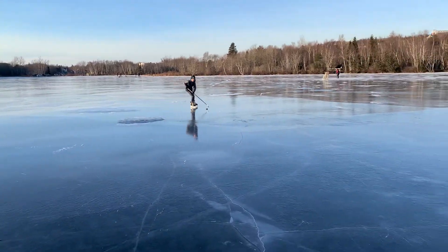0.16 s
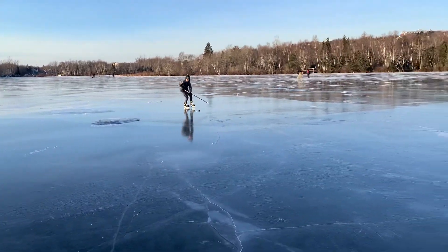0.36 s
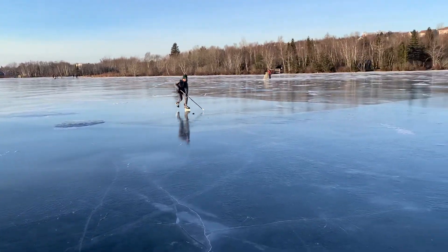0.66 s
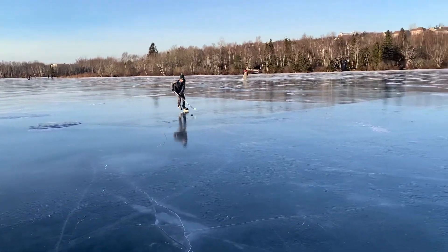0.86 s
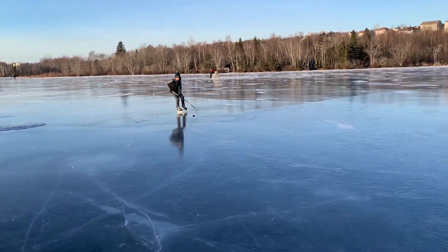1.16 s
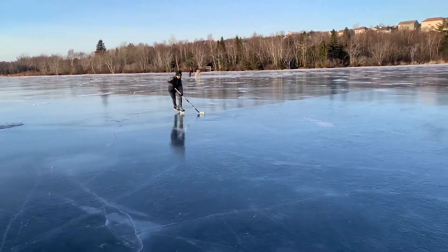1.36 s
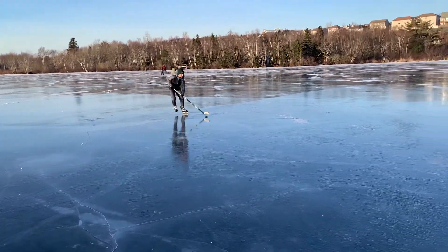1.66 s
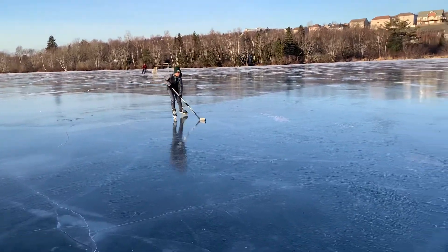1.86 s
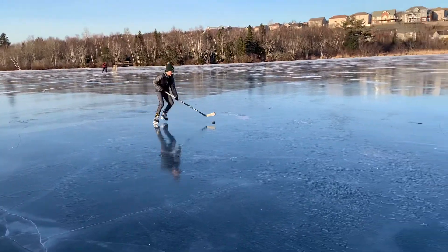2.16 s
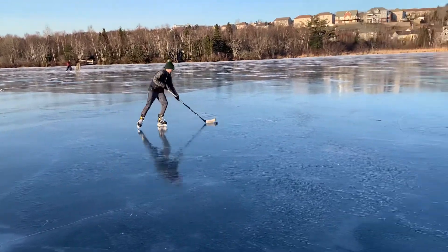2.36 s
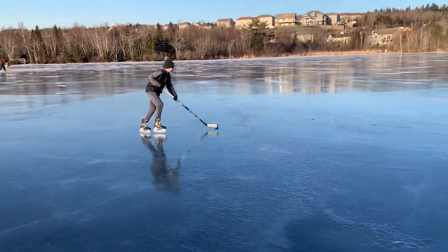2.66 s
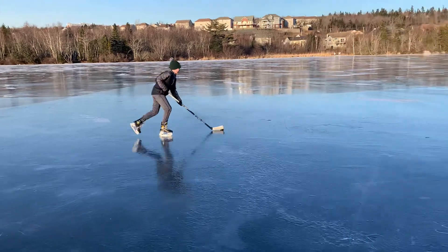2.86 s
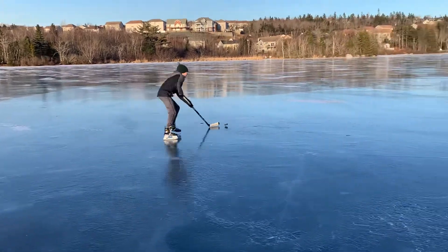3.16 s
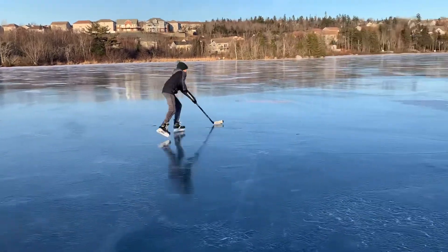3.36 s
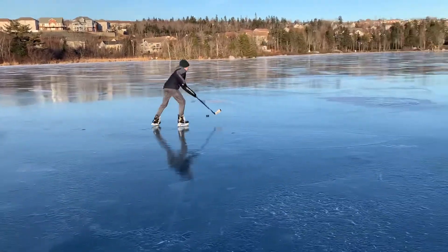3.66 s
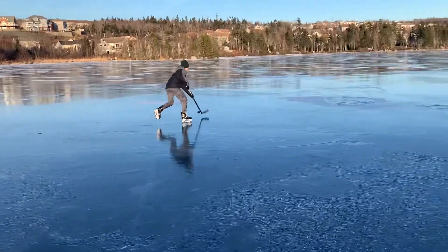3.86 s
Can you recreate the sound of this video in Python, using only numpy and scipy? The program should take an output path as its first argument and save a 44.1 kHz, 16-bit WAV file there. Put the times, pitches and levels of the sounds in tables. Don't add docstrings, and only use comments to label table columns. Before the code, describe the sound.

Ice skates scraping and catching on a frozen lake, with sharp puck-on-stick knocks over low wind rumble

```python
import sys
import numpy as np
from scipy import signal
from scipy.fft import rfft, irfft
from scipy.io import wavfile
from scipy.ndimage import uniform_filter1d

SR = 44100
rng = np.random.default_rng(int(sys.argv[2]) if len(sys.argv) > 2 else 0)


def inscribe(sig):
    pcm = np.round(np.clip(np.atleast_2d(sig).T, -1, 1) * 32767)
    wavfile.write(sys.argv[1], SR, pcm.astype(np.int16))


def voltage_ratio(decibels):
    exponent = np.asarray(decibels, float) / 20
    return 10 ** exponent


N = 176400
FREQS = np.fft.rfftfreq(N, 1 / SR)

# [f/Hz, level/dB]
WIND_COLOUR = [(20, -11), (55, 5.5), (130, 5.5), (190, -0.5), (300, -5.5), (500, -14), (1500, -45),
               (16000, -62)]
# [t/s, peak level/dB]
LUMPS = [(0.052, -39), (0.523, -41.5), (0.978, -46), (1.083, -42.5), (1.22, -56), (1.362, -31.5),
         (1.438, -48), (1.512, -47), (1.609, -45), (1.799, -47), (1.877, -31), (1.932, -37.5), (2.079, -48),
         (2.304, -33), (2.512, -37), (2.669, -34), (2.746, -27.5), (2.792, -24.5), (2.869, -31),
         (2.955, -37), (3.033, -33), (3.094, -45), (3.164, -53), (3.225, -23), (3.401, -30), (3.674, -21)]
# [t/s, peak level/dB, ring f/Hz, bending wave level/dB, crack level/dB]
LANDINGS = [
    (0.249, -30.5, 1690, -13, -13),
    (0.253, -32, 1915, -15, -2.5),
    (2.67, -26.5, 1610, 4, -10.5),
    (2.867, -17, 1260, -4.5, -22.5),
    (3.913, -37, 1330, -12, -9),
    (3.923, -33.5, 1350, -7, -12),
]
# [t/s, length/s, level/dB]
DRAGS = [
    (0.974, 0.14, -57.5),
    (1.527, 0.077, -37),
    (3.225, 0.26, -44),
]
# [t/s, level/dB]
HISS_LEVEL = [(0, -76), (.2, -67), (.4, -66.5), (.54, -51.5), (.7, -67.5), (.92, -59), (1.05, -51),
              (1.2, -64.5), (1.36, -48.5), (1.5, -64.5), (1.9, -54), (2.05, -77), (2.2, -76), (2.27, -49.5),
              (2.6, -52), (3.1, -57), (3.3, -50), (3.6, -59), (4, -62)]
# [t/s, level/dB]
SCRAPE_LEVEL = [(0, -56.5), (.12, -55), (.4, -75.5), (.54, -59.5), (.9, -65), (1.02, -58), (1.25, -60),
                (1.4, -47), (1.85, -48.5), (2.15, -53.5), (2.55, -48), (2.8, -43), (3.15, -51.5),
                (3.3, -39), (3.56, -59), (3.7, -44), (3.8, -57), (4, -58)]
# [f/Hz, level/dB]
HISS_COLOUR = [(500, -16), (2000, -1.5), (4500, -3), (7000, -6.5), (9500, 2.5), (13200, -13), (15000, -8),
               (16500, -43)]
# [f/Hz, level/dB]
SCRAPE_COLOUR = [(100, -6.5), (170, 7.5), (280, -16), (450, 1), (750, -12.5), (1250, -3.5), (3500, -10),
                 (11000, -38)]
# [f/Hz, damping (t60/s = 9.9 / damping), level/dB]
ICE_RING = [(1100, 80, 36.5), (1600, 550, 22), (2200, 280, 39)]
# [t/s, peak level/dB, ring f/Hz, crack level/dB]
CATCHES = [(1.403, -30.5, 1690, -14), (1.488, -31.5, 1250, -4), (1.552, -23.5, 1290, -4),
           (1.571, -29, 1770, -2), (1.745, -46, 3340, -9), (1.886, -24, 1620, -31),
           (1.981, -36.5, 1880, -6), (2.209, -34, 1500, -14), (2.239, -31, 1520, -6),
           (2.258, -30, 1490, -8), (2.396, -41.5, 1670, -9), (2.429, -28, 1520, -23), (2.535, -32, 1630, 7),
           (2.596, -46.5, 1660, -9), (2.959, -41, 2180, -9), (2.984, -29, 2140, -5),
           (3.247, -29, 1220, -18), (3.278, -28, 1200, -15), (3.294, -26, 1220, -3),
           (3.316, -24.5, 1200, -14), (3.33, -27.5, 1220, -27), (3.344, -29, 1240, -26),
           (3.362, -35, 1270, -9), (3.381, -30.5, 1330, -14), (3.476, -32, 1320, -1),
           (3.62, -40, 1430, -12)]
# [t/s, peak level/dB, ring f/Hz]
CHIPS = [(0.322, -52.5, 2520), (0.782, -51.5, 1370), (0.795, -55, 1290), (0.977, -55, 1570),
         (1.388, -39, 1670), (1.65, -37, 1090), (1.682, -41.5, 1590), (1.796, -50.5, 1280),
         (2.409, -58, 1550), (3.494, -43.5, 1280), (3.802, -47.5, 2160), (3.844, -49.5, 1126)]
# [t/s, peak level/dB, ring f/Hz, bending wave level/dB, crack level/dB]
BLOWS = [(0.076, -43.5, 1480, -0.5, 4.5), (0.525, -50.5, 1600, 10, 12.5), (0.705, -35, 2910, -28, -4),
         (1.124, -39, 1570, -13, 2.5), (1.364, -35, 2950, -7, 4), (1.437, -37, 1610, -25, 5.5),
         (1.58, -36.5, 1210, 6.5, 2.5), (1.612, -21.5, 932, 1, 4), (1.897, -19, 1635, -3.5, -17),
         (2.491, -27, 1600, -9, -42), (2.73, -22.5, 1640, -14, 3.5), (2.748, -30.5, 1070, -0.5, -6),
         (2.792, -13, 1525, -3.5, -17), (2.805, -20, 1200, -17, -43), (3.043, -35, 2600, -2, 5),
         (3.219, -31, 1200, -6, -32), (3.661, -34.5, 1640, 7, 3.5), (3.681, -30, 1140, -2, -2),
         (3.722, -36, 1425, -6, 2.5)]
# [t/s, peak level/dB, upper ring level/dB]
STICK_HITS = [
    (0.488, -41, -8),
    (1.538, -29.5, -6),
    (1.824, -35, -8),
    (1.861, -16, 4.5),
    (2.32, -19.5, -10.5),
    (3.137, -41, 1),
    (3.162, -9.5, 1.5),
]
# [f/Hz, level/dB, t60/s]
STICK_MODES = [(540, -14, .04), (950, -9, .02), (1200, 1.5, .036), (1640, -2, .022), (2170, -7, .025),
               (3050, -10, .022), (3560, -1, .024), (3850, -5, .02), (4320, -12, .02)]
# [f/Hz, level/dB]
BEND_COLOUR = [(40, -48), (130, -1), (250, 2), (500, 2.5), (1000, -1), (2500, 2.5), (8000, -113)]
# [f/Hz, half turns]
TWIST_NEAR = [(150, 0), (300, 1), (510, 2), (680, 3), (900, 4), (1130, 5), (1270, 6), (1450, 6.3),
              (1750, 6), (2050, 6.6), (2500, 7), (2900, 7), (3300, 8), (4000, 9), (4700, 9.1), (6300, 10),
              (6900, 10), (7800, 9), (8800, 9), (10500, 8), (11800, 8), (12800, 7), (14000, 7), (15000, 6)]
# [f/Hz, half turns]
TWIST_FAR = [(150, 0), (300, 1), (510, 2), (680, 3), (900, 4), (1130, 5), (1270, 6), (2300, 6.05),
             (3000, 6.35), (3700, 7), (4500, 7.7), (6300, 8), (6900, 8), (7800, 7), (8800, 7), (10500, 6),
             (11800, 6), (12800, 5), (14000, 5), (15000, 4)]
# [f/Hz, half turns]
SWAY = [(1000, 0), (1500, .2), (6500, .2), (8000, .05)]
# [f/Hz, level/dB]
LEAN = [(250, 0), (620, -6), (1200, -2), (2500, -4), (3300, -1), (4500, -4), (6000, -11), (7200, 0)]
# [t/s, share of the lean]
ASIDE = [(0, -0.072), (1.2, -0.025), (1.45, 0.95), (2.4, 0.43), (2.8, 0.64), (4, 0.99)]
# [f/Hz, level/dB]
SCATTER = [(120, -30), (600, -6), (1200, -7), (2600, -2), (5000, -1), (6800, -5), (8200, -11), (16000, -8)]
# [f/Hz, level/dB]
BAND_LIMIT = [(15700, 0), (15950, -32), (16900, -36), (17200, -90)]

SPREAD = 0.14
NEAR_S = 1.4
CONTACT_S = .0013
SLIP_DB = 2.0
CHIP_BEND_DB = -5.5


def evened(x):
    return x / np.sqrt(np.mean(x ** 2) + 1e-20)


def peaked(x):
    return x / np.abs(x).max()


def read(points, hz):
    f, value = np.transpose(points)
    return np.interp(np.log(hz + 1), np.log(f + 1), value)


def curve(points):
    return voltage_ratio(np.interp(np.arange(N) / SR, *np.transpose(points)))


def equalised(x, points):
    return irfft(rfft(x) * voltage_ratio(read(points, FREQS)), N)


def colour(x, points):
    return evened(equalised(x, points))


def wobble(rate_hz, depth_db):
    lowpass = signal.butter(2, rate_hz, fs=SR, output="sos")
    return voltage_ratio(depth_db * evened(signal.sosfilt(lowpass, rng.standard_normal(N))))


def grit(per_s, spread_db, smooth):
    size = voltage_ratio(spread_db * np.minimum(rng.exponential(1, N), 4))
    slips = size * (rng.random(N) < per_s / SR) * rng.standard_normal(N)
    return evened(slips) + smooth * rng.standard_normal(N)


def patches(shape, bins, frames):
    across = uniform_filter1d(rng.standard_normal(shape), bins, 0)
    return evened(uniform_filter1d(across, frames, 1))


def patchy(x):
    z = signal.stft(x, SR, nperseg=512)[2]
    gain = voltage_ratio(3.2 * patches(z.shape, bins=24, frames=14))
    return evened(signal.istft(z * gain, SR, nperseg=512)[1][:N])


def decay(t, t60):
    return voltage_ratio(-60 * t / t60)


def ring(t, hz, t60):
    return decay(t, t60) * np.sin(2 * np.pi * hz * t)


def band(x, order, low_hz, high_hz):
    return signal.lfilter(*signal.butter(order, [low_hz, high_hz], "band", fs=SR), x)


def add(mix, s, sound):
    part = mix[round(s * SR):][:len(sound)]
    part += sound[:len(part)]


def bend(x):
    hz = np.fft.rfftfreq(len(x), 1 / SR)
    delay = np.exp(-4j * np.pi * SPREAD * (np.sqrt(hz) - hz / 140))
    return irfft(rfft(x) * voltage_ratio(read(BEND_COLOUR, hz)) * delay, len(x))


def blow(db, hz, bend_db, crack_db):
    t, noise = np.arange(4096) / SR, rng.standard_normal(4096)
    ring_t60, crack_t60, tail_t60 = .011, .006, .055
    rise = np.minimum(t / CONTACT_S, 1) ** 2
    rings = ring(t, hz, ring_t60) + .4 * ring(t, hz * 1.37, ring_t60)
    rings = rise * (rings + .3 * ring(t, hz * 2.3, ring_t60 / 2))
    crack = rise * band(noise, 1, 6500, 13000) * decay(t, crack_t60)
    tail = rise * band(noise[::-1], 1, 800, 3000) * decay(t, tail_t60)
    sound = peaked(rings) + voltage_ratio(crack_db) * peaked(crack)
    sound += voltage_ratio(-5 + 0.29 * crack_db) * peaked(tail)
    sound += voltage_ratio(bend_db) * peaked(bend(t == 0))
    return voltage_ratio(db) * sound


def stick(db, upper_db):
    t = np.arange(4096) / SR
    modes = sum(voltage_ratio(d + upper_db * (hz > 2500)) * ring(t, hz, t60) for hz, d, t60 in STICK_MODES)
    rattle = rng.standard_normal(4096) * np.minimum(t / CONTACT_S, 1) * decay(t, .03)
    strike = 11 * (np.arange(len(t)) == 40)
    contact = band(rattle + strike, 2, 450, 5000)
    shaft = signal.fftconvolve(modes, contact)[:len(t)]
    return voltage_ratio(db) * (peaked(shaft) + voltage_ratio(-27.0) * peaked(bend(t == 0)))


def wind():
    load = evened(curve(SCRAPE_LEVEL)) ** 0.59
    common = colour(rng.standard_normal(N), WIND_COLOUR)
    opposed = np.array([[1], [-1]]) * colour(rng.standard_normal(N), WIND_COLOUR)
    gusts = wobble(4.9, depth_db=2.5)
    return voltage_ratio(-54) * load * (common + voltage_ratio(-25.0) * opposed) * gusts


def thuds():
    out, t = np.zeros(N), np.arange(4096) / SR
    push = t * np.exp(-t / 0.00083)
    for s, db in LUMPS:
        add(out, s, voltage_ratio(db - 5) * peaked(bend(push)))
    return out


def landings():
    out = np.zeros(N)
    for s, *row in LANDINGS:
        add(out, s, blow(*row))
    return voltage_ratio(3.5) * out


def drags():
    t, level = np.arange(2048) / SR, np.zeros(N)
    for s, length, db in DRAGS:
        swell = np.sin(np.linspace(0, np.pi, round(length * SR))) ** 0.81
        add(level, s, voltage_ratio(db) * swell)
    shaft = sum(voltage_ratio(d - 19.0 * (hz > 2500)) * ring(t, hz, t60) for hz, d, t60 in STICK_MODES[1:])
    slips = grit(620, SLIP_DB, smooth=0.17)
    return level * wobble(37, SLIP_DB) * evened(signal.oaconvolve(slips, shaft)[:N])


def blades():
    spray = patchy(colour(grit(3300, 2.3, smooth=0.84), HISS_COLOUR))
    hiss = spray * wobble(53.0, 2.6) * curve(HISS_LEVEL)
    slips = grit(800, SLIP_DB, smooth=2.14)
    t = np.arange(2048) / SR
    modes = sum(voltage_ratio(db) * ring(t, hz, 9.9 / damping) * damping for hz, damping, db in ICE_RING)
    rung = evened(signal.oaconvolve(slips, modes)[:N])
    bent = irfft(rfft(slips) * np.exp(-4j * np.pi * SPREAD * np.sqrt(FREQS)), N)
    body = patchy(colour(bent, SCRAPE_COLOUR))
    scrape = (body + voltage_ratio(-10.5) * rung) * wobble(32.0, SLIP_DB) * curve(SCRAPE_LEVEL)
    return voltage_ratio(4) * hiss + scrape


def knocks():
    out = np.zeros(N)
    for s, db, hz, crack_db in CATCHES:
        add(out, s, blow(db - 8, hz, CHIP_BEND_DB, crack_db))
    for s, db, hz in CHIPS:
        add(out, s, blow(db, hz, CHIP_BEND_DB, crack_db=6.5))
    for s, *row in BLOWS:
        add(out, s, blow(*row))
    for s, *row in STICK_HITS:
        add(out, s, stick(*row))
    return voltage_ratio(5.5) * out


def ports(x, twist):
    hz, s, z = signal.stft(x, SR, nperseg=2048, noverlap=1536)
    sway = np.outer(read(SWAY, hz), .5 + .5 * (s > NEAR_S)) * patches(z.shape, bins=50, frames=16)
    turns = np.interp(hz, *np.transpose(twist))[:, None] + sway
    lean_db = np.outer(read(LEAN, hz), np.interp(s, *np.transpose(ASIDE)))
    half = np.exp(.5j * np.pi * turns) * voltage_ratio(lean_db / 2)
    pair = signal.istft(z * np.array([half, 1 / half]), SR, nperseg=2048, noverlap=1536)[1][:, :N]
    hz, s, z = signal.stft(x, SR, nperseg=128)
    z = z * voltage_ratio(-7 * (s < NEAR_S))
    z = z * np.exp(2j * np.pi * rng.random((2, *z.shape)))
    scattered = signal.istft(z, SR, nperseg=128)[1][:, :N]
    return pair + equalised(scattered, SCATTER)


def masked(x):
    hz, s, z = signal.stft([x[0] + x[1], x[0] - x[1]], SR, nperseg=2048)
    power = (abs(z[:, :1024].reshape(2, 64, 16, -1)) ** 2).sum(2)
    power = uniform_filter1d(power, size=2, axis=1)
    sway = uniform_filter1d(rng.standard_normal(power.shape[1:]), size=4, axis=1)
    sway = evened(uniform_filter1d(sway, size=12, axis=0))
    near = np.outer(hz[:1024:16] < 7000, s > NEAR_S)
    margin_db = -10 + 5 * sway - 6 * near
    keep = power > voltage_ratio(2 * margin_db) * power[::-1]
    top = power[:, 8:].sum((0, 1))
    blow_frame = top > voltage_ratio(4) * uniform_filter1d(top, size=5)
    keep = keep | blow_frame | (power > power[::-1])
    z[:, 96:1024] *= np.repeat(keep, 16, axis=1)[:, 96:]
    mid, side = signal.istft(z, SR, nperseg=2048)[1][:, :N] / 2
    return np.array([mid + side, mid - side])


def scene():
    near = thuds() + drags() + blades() + knocks()
    return wind() + ports(landings(), TWIST_FAR) + ports(near, TWIST_NEAR)


def roll_off(x):
    return signal.sosfilt(signal.butter(12, 17150, fs=SR, output="sos"), x)


def record(dry):
    heard = masked(equalised(dry, BAND_LIMIT))
    return roll_off(heard)


dry = scene()
out = record(dry)
inscribe(out)
```